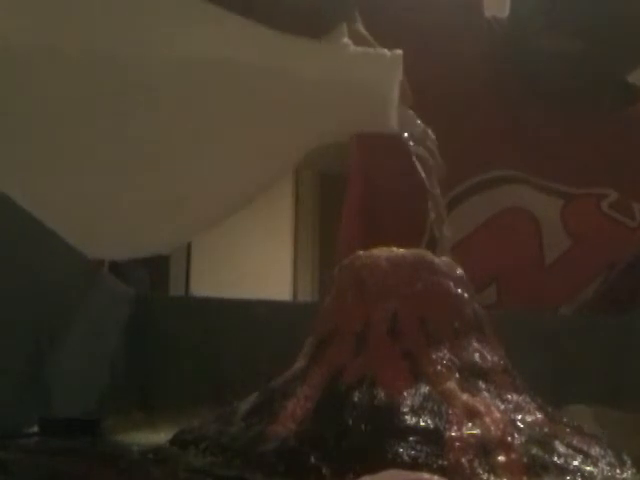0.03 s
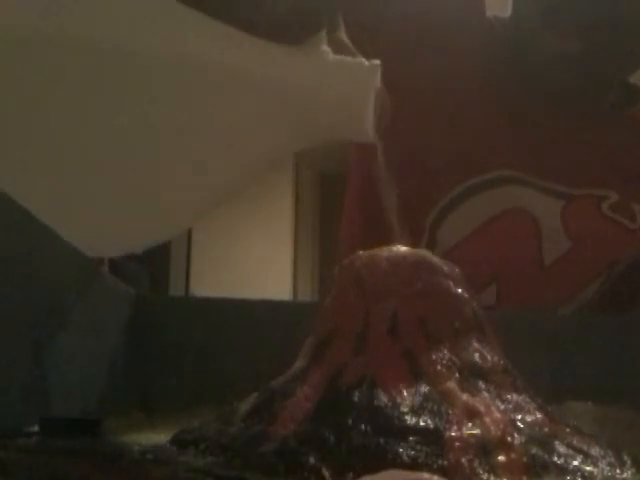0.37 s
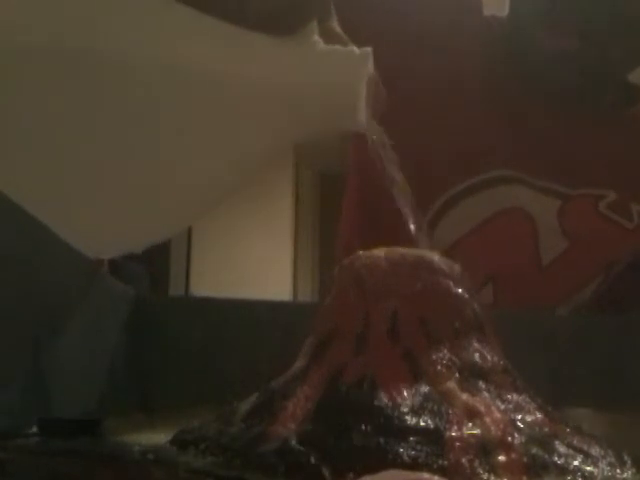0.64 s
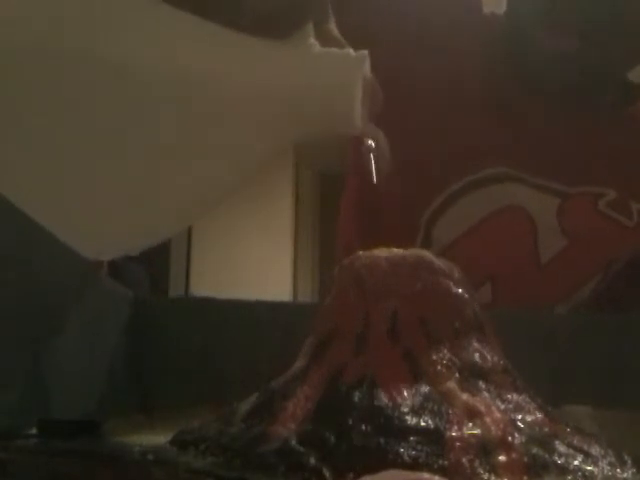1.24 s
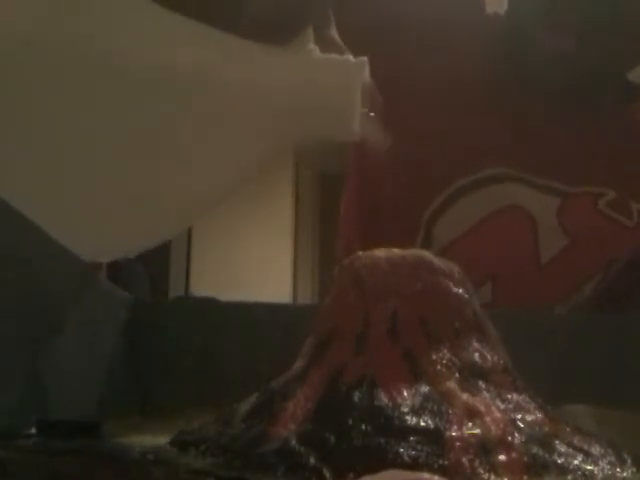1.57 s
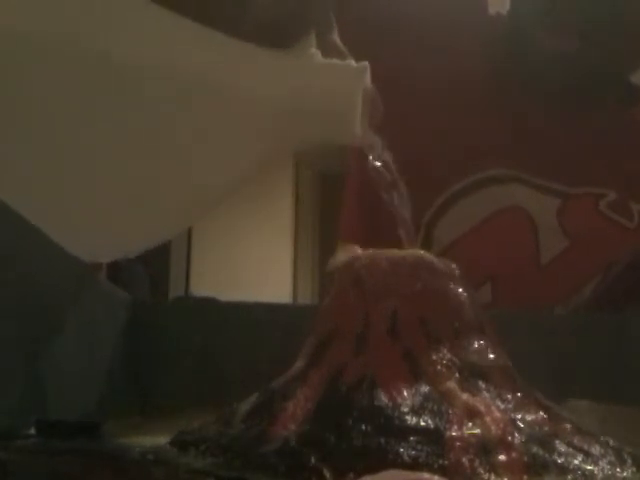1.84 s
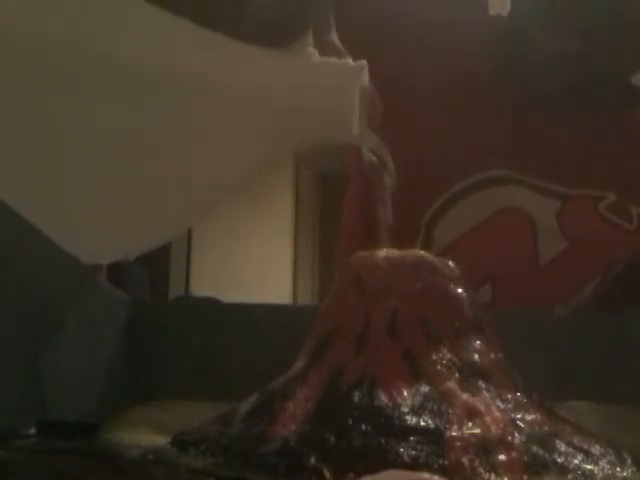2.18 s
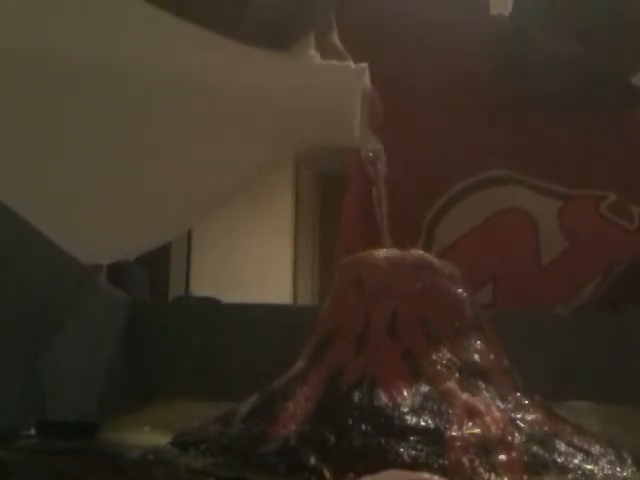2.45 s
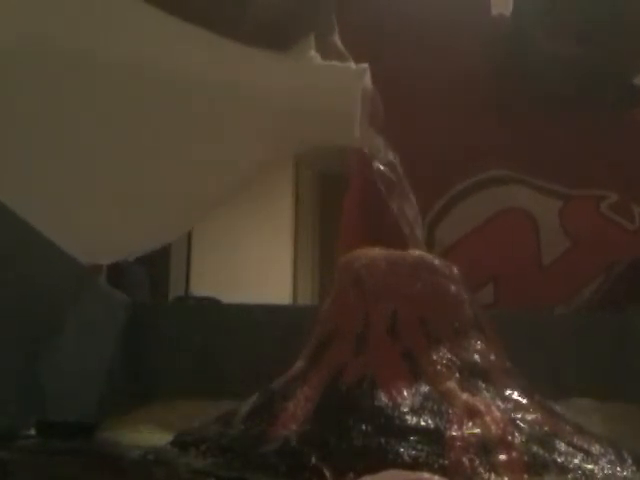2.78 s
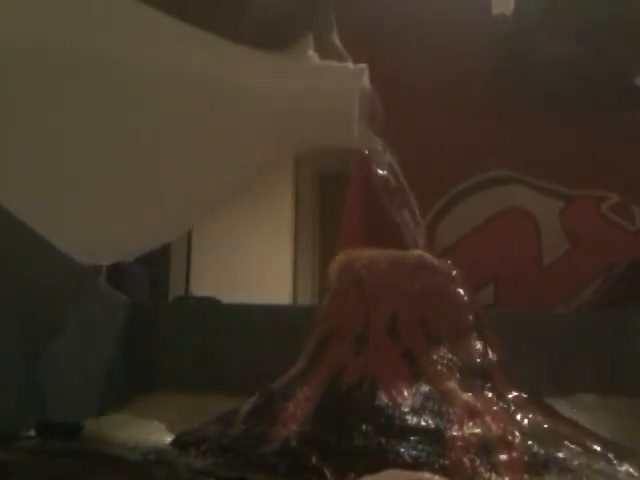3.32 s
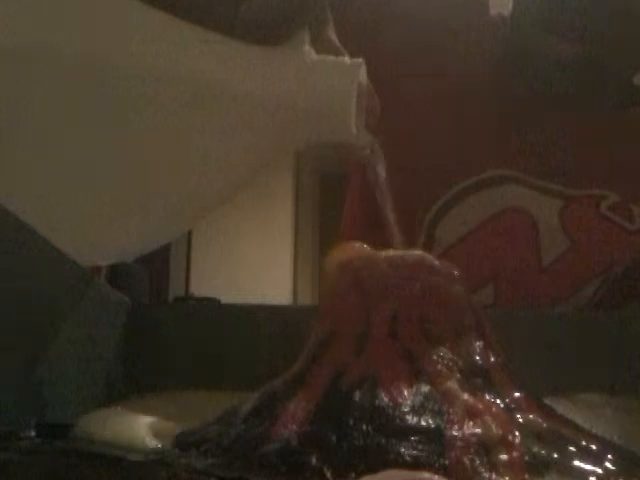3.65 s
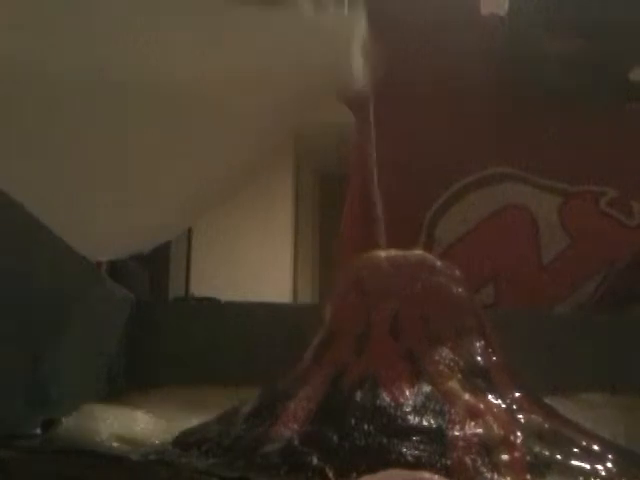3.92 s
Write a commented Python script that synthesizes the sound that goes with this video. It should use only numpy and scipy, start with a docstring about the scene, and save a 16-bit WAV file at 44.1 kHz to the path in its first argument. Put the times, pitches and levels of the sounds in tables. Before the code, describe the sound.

Foam fizzes faintly as liquid pours into a model volcano in a quiet room. Something brushes the microphone around 0.4 seconds, and soft hollow bumps come between 0.3 and 1.5 seconds. From 1.5 seconds the hiss swells, staying dense from about 2 seconds to the end at 4. Beneath it the stream softly patters, splashes and gurgles, while bubbles and drips snap here and there throughout.

```python
"""Foam hisses faintly, then swells, as liquid pours from a plastic jug into a model volcano.
Tiny bursts make the hiss: the finest bubbles first, coarser ones as the foam spreads.
The stream patters, gurgles and splashes softly on the cone; a few large bubbles and drips snap.
Early on something brushes the small camera, and soft bumps ring a hollow body.
The room is quiet; the sound is mono."""
import sys
import numpy as np
from scipy import signal
from scipy.fft import rfft, irfft
from scipy.io import wavfile

SR = 44100
rng = np.random.default_rng(int(sys.argv[2]) if len(sys.argv) > 2 else 0)


def put_to_file(sound):
    """Save the sound as 16-bit audio at rate SR, in the file named by the first command-line argument."""
    columns = np.atleast_2d(sound).T  # one column per channel
    safe = np.clip(columns, -1, 1)
    whole_steps = np.round(safe * 32767)
    wavfile.write(sys.argv[1], SR, whole_steps.astype(np.int16))


N = 176400
T = np.arange(N) / SR

# Foam level by bubble size. Each row: time in seconds, fine, medium and coarse level in dB.
FOAM_LEVELS = [(0.0, -55, -54.5, -60.5), (0.23, -51, -54.5, -61), (0.55, -50.5, -50.5, -63),
               (0.68, -54.5, -57, -67), (0.82, -53, -52, -58.5), (1.15, -54.5, -53.5, -60.5),
               (1.36, -52.5, -51, -64), (1.5, -48.5, -47.5, -55.5), (1.7, -43.5, -44.5, -66),
               (2.08, -39.5, -39.5, -58), (2.3, -39.5, -37, -56), (2.55, -41, -36, -50),
               (2.74, -42, -36, -46.5), (2.88, -41.5, -37.5, -49), (3.3, -41, -36.5, -46.5),
               (3.55, -42, -36, -45.5), (3.82, -40, -36.5, -45), (4.0, -39.5, -35.5, -44)]


def amp(db):
    """Decibels to gain."""
    return 10 ** (np.asarray(db) / 20)


def unit_rms(x):
    """Scales to an rms of 1."""
    return x / np.sqrt(np.mean(x ** 2) + 1e-20)


def envelope(levels):
    """Gain curve through rows of time in seconds, level in dB."""
    return amp(np.interp(T, *np.transpose(levels)))


def add(mix, start_s, sound):
    """Mixes a sound in at start_s."""
    part = mix[max(round(start_s * SR), 0):][:len(sound)]
    part += sound[:len(part)]


def convolve(x, taps):
    """Applies taps scaled to unit energy; keeps the length of x."""
    return signal.fftconvolve(x, taps / np.linalg.norm(taps))[:len(x)]


def colour(x, spectrum, size=4096):
    """Minimum-phase filter through rows of frequency in Hz, relative level in dB."""
    hz, db = np.transpose(spectrum)
    bins_hz = abs(np.fft.fftfreq(size, 1 / SR))
    log_gain = np.log(amp(np.interp(np.log(bins_hz + 1), np.log(hz), db)))
    response = np.exp(np.conj(signal.hilbert(log_gain)))
    return convolve(x, np.fft.ifft(response).real)


def wander(corner_hz):
    """Random drift from 2 Hz up, rolling off above corner_hz; rms 1."""
    hz = np.fft.rfftfreq(N, 1 / SR)
    spectrum = rfft(rng.standard_normal(N)) * (hz > 2) / (1 + (hz / corner_hz) ** 2)
    return unit_rms(irfft(spectrum, N))


def clicks(per_s, spread_db):
    """Random clicks of uneven size and sign; rms 1."""
    size = amp(spread_db * np.minimum(rng.exponential(1, N), 5))
    sign = rng.choice([-1., 1.], N)
    return unit_rms(size * sign * (rng.random(N) < per_s / SR))


def ring(modes, t):
    """Free decay of an object's modes, at random phases."""
    return sum(amp(db - 60 * t / t60_s) * np.sin(2 * np.pi * (hz * t + rng.random()))
               for hz, db, t60_s in modes)


def foam(flutter_db=0.5):
    """Thousands of tiny bursts a second, in three sizes that swell one after another."""
    # Burst spectra by bubble size. Each row: frequency in Hz, relative level in dB.
    fine = [(3000, -70), (6000, -18), (7900, -7.5), (9300, -10), (10200, -5.5), (11200, -1), (12700, 0.5),
            (13600, 0), (15200, -14.5)]
    medium = [(1500, -44), (2600, -18), (3300, -14.5), (4000, -9.5), (4650, -4.5), (4900, -4), (5330, -1),
              (5850, -6.5), (6350, -11), (6800, -10), (7500, -14), (9500, -19.5), (14000, -47.5)]
    coarse = [(250, -5), (500, -16.5), (950, -24.5), (1150, -9.5), (1500, 2), (1750, -6), (2080, 4),
              (2450, -8.5), (3000, -1), (4200, -6), (7000, -8), (11000, -8.5)]
    times_s, *levels_db = np.transpose(FOAM_LEVELS)
    out = np.zeros(N)
    for db, spectrum in zip(levels_db, (fine, medium, coarse)):
        bursts = colour(clicks(per_s=16000, spread_db=1.86), spectrum)
        out += bursts * amp(np.interp(T, times_s, db) + flutter_db * wander(corner_hz=25))
    return out


def crackle(surge_db=4.5, relative_db=-14):
    """Clumps of foam collapse in small surges, following the level of the medium bubbles."""
    # Collapse spectrum. Each row: frequency in Hz, relative level in dB.
    spectrum = [(2000, -35.5), (3800, -16.5), (4650, -9), (4900, -12), (5330, 0), (5800, -12), (7000, -17),
                (9500, -25), (13000, -24)]
    times_s, _, medium_db, _ = np.transpose(FOAM_LEVELS)
    surges = unit_rms(clicks(per_s=500, spread_db=2) * amp(surge_db * wander(corner_hz=8.4)))
    return colour(surges, spectrum) * amp(np.interp(T, times_s, medium_db) + relative_db)


def stream():
    """The stream patters softly on the cone."""
    # Patter strength. Each row: time in seconds, level in dB.
    levels = [(0.0, -65), (1.3, -73), (1.8, -59), (2.35, -69), (2.6, -58), (2.9, -75), (3.18, -55.5),
              (3.52, -75), (3.75, -57), (4.0, -55.5)]
    # Patter spectrum. Each row: frequency in Hz, relative level in dB.
    spectrum = [(45, -28), (80, -6), (140, 3.5), (190, -6), (300, 5), (480, 0), (720, -4.5), (930, -13),
                (1150, -17), (2500, -45)]
    return colour(clicks(per_s=180, spread_db=0.5) * envelope(levels), spectrum)


def gurgle(low_hz=600.5, high_hz=2760, sizes=40, per_s=600, decay_cycles=6, spread_db=2.5):
    """Air bubbles trapped by the stream ring for a few cycles, damped by the foam."""
    # Gurgle strength. Each row: time in seconds, level in dB.
    levels = [(0.0, -68), (1.6, -66), (2.0, -60), (2.35, -61), (2.6, -55.5), (2.9, -56.5), (3.5, -55.5),
              (4.0, -49.5)]
    # Gurgle spectrum. Each row: frequency in Hz, relative level in dB.
    spectrum = [(500, -1), (950, -4), (1200, -2.5), (1500, 1.5), (1750, -2), (2080, 1.5), (2700, -0.5)]
    out, t = np.zeros(N), T[:4096]
    for hz in np.linspace(low_hz, high_hz, sizes):
        age = t * hz / decay_cycles
        blip = (1 - np.exp(-6 * age)) * np.exp(-age) * np.sin(2 * np.pi * hz * t)
        births = rng.random(N) < per_s / sizes / SR
        strength = amp(spread_db * rng.uniform(-2.2, 2, N))
        out += convolve(births * strength, blip)
    return unit_rms(colour(out, spectrum)) * envelope(levels)


def room(drift_hz=1.3):
    """Low rumble of the room's air, slowly rising, with a faint hum."""
    # Air spectrum. Each row: frequency in Hz, relative level in dB.
    spectrum = [(20, -2), (45, -2), (88, 2), (140, 1), (185, -6.5), (240, -5.5), (330, -2.5), (430, -11.5),
                (478, -1.5), (525, -21.5), (620, -7.5), (1000, -17), (2000, -31), (5000, -19.5)]
    # Air noise strength. Each row: time in seconds, level in dB.
    levels = [(0.0, -59.5), (0.65, -56), (1.0, -54.5), (1.7, -54), (3.0, -53.5), (4.0, -50)]
    # Hum tones. Each row: frequency in Hz, rms level in dB.
    tones = [(89, -68), (480, -73)]
    out = unit_rms(colour(rng.standard_normal(N), spectrum)) * envelope(levels)
    for hz, db in tones:
        cycles = np.cumsum(hz + drift_hz * wander(corner_hz=14)) / SR
        out += amp(db) * unit_rms(np.sin(2 * np.pi * cycles))
    return out


def pops(crack_decay_s=0.00051):
    """Large bubbles and drips snap: a sharp crack, then a few cycles of ringing."""
    # Snaps. Each row: start in seconds, level in dB, pitch in Hz, decay in ms, relative crack gain.
    snaps = [(0.0150, -34.5, 4800, 0.48, 0.15), (0.0325, -37, 4900, 0.21, .13),
             (0.0745, -34, 5400, .3, .13), (0.0795, -27.5, 5460, 0.32, 0.16), (0.3647, -29, 5800, 0.2, .4),
             (0.582, -33, 5760, 0.14, 0.49), (0.7066, -31, 4690, 0.32, .05),
             (0.7172, -26, 5150, 0.24, 0.06), (0.7276, -32, 4180, 0.27, 0.33),
             (0.7815, -33, 5700, 0.17, .2), (0.884, -34, 5220, 0.16, .2), (0.9036, -35, 5170, 0.25, .25),
             (0.9435, -33, 5230, .2, .2), (0.9687, -33.5, 5180, 0.18, .25), (1.4640, -29, 4530, 0.16, .13),
             (1.5115, -23.5, 5450, 0.33, 1.6), (1.8855, -31, 5330, 0.63, .06),
             (1.8924, -17, 5500, 0.18, .1), (2.1980, -26, 5170, 0.4, 0.2), (2.4914, -24, 5150, 0.46, 0.06),
             (2.7765, -23.5, 3840, 0.57, 0.04), (2.9756, -19.5, 5100, 0.12, 0.27),
             (3.2917, -28, 5300, 0.22, .25)]
    # Crack spectrum. Each row: frequency in Hz, relative level in dB.
    spectrum = [(200, -9), (750, -3.5), (2200, -24), (4500, -9), (6800, -5), (9500, -11), (11500, -14),
                (13400, 4.5), (14500, -13)]
    out, t = np.zeros(N), T[:1024]
    for start_s, db, hz, decay_ms, crack_gain in snaps:
        age = t * 1000 / decay_ms
        ping = age * np.exp(1 - age) * np.sin(2 * np.pi * hz * t)
        crack = colour(rng.choice([-1., 1.], len(t)) * np.exp(-t / crack_decay_s), spectrum)
        add(out, start_s, amp(db) * (ping + crack_gain * crack))
    return out


def echo(x, level_db=-4.5, delay_s=0.002, t60_s=0.075):
    """Short scatter from the tray and nearby walls."""
    t = T[:SR // 4]
    reflections = rng.standard_normal(len(t)) * (rng.random(len(t)) < 0.3)
    decay = (t > delay_s) * amp(-60 * t / t60_s)
    return amp(level_db) * convolve(x, reflections * decay)


def brush(grips_per_s=2500, flutter_db=2.4, case_db=-3):
    """Many small grips and slips make a low rumble and a dry scratch, and ring the camera's case."""
    # Brush stroke. Each row: time in seconds, rumble level in dB, scratch level in dB.
    stroke = [(0.25, -68, -59), (0.272, -53, -50.5), (0.30, -46, -69), (0.325, -44.5, -44),
              (0.365, -34, -41), (0.41, -38, -43), (0.45, -41, -42.5), (0.49, -55, -48), (0.55, -66, -68)]
    # Friction spectra. Each row: frequency in Hz, relative level in dB.
    rumble_spectrum = [(20, -8), (70, 2), (150, 0.5), (230, -5.5), (330, -8), (460, -16.5), (590, -4),
                       (750, -17), (900, -15), (1300, -18.5), (2500, -25)]
    scratch_spectrum = [(400, 3.5), (1000, -36), (1600, -5), (2100, -7), (2700, -6), (3900, -4), (4800, 4),
                        (5500, 5.5), (6400, -5), (8000, 2.5), (9500, -12), (13000, -12), (15000, -22)]
    # Case modes. Each row: frequency in Hz, relative level in dB, T60 in seconds.
    case_modes = [(139, -4.5, 0.12), (210, 0.5, 0.15), (533, -6, 0.16), (592, 1, 0.08), (675, -3, 0.14),
                  (780, -5, 0.088), (890, -7.5, 0.16), (1006, -8, 0.13), (1140, -13, 0.14),
                  (1510, -5, 0.052), (2080, -4.5, 0.03)]
    times_s, rumble_db, scratch_db = np.transpose(stroke)
    grips = clicks(grips_per_s, spread_db=1) * amp(np.interp(T, times_s, rumble_db))
    slips = clicks(grips_per_s, spread_db=2.6)
    slips *= amp(np.interp(T, times_s, scratch_db) + flutter_db * wander(corner_hz=90))
    hollow = amp(case_db) * convolve(slips, ring(case_modes, T[:SR // 4]))
    touching = (T > times_s[0]) * (T < times_s[-1])
    return (colour(grips, rumble_spectrum) + colour(slips, scratch_spectrum) + hollow) * touching


def bumps():
    """Soft, scuffing contacts set a hollow body ringing."""
    # Contacts. Each row: start in seconds, ring gain in dB, contact time in seconds, scuff level in dB.
    contacts = [(0.263, -33, 0.017, -49), (0.497, -31, 0.036, -59), (0.776, -34.5, 0.019, -50),
                (0.883, -62, .005, -52), (0.901, -56, 0.0058, -51), (0.986, -34.5, 0.019, -48),
                (1.046, -64, 0.015, -53.5), (1.516, -41, 0.012, -68)]
    # Body modes. Each row: frequency in Hz, relative level in dB, T60 in seconds.
    body_modes = [(112, 1, 0.047), (232, -1, .11), (409, -8.5, 0.051), (605, -14, 0.067), (774, -13, 0.15),
                  (1040, -10, 0.049), (1486, -2, 0.02), (1720, -19.5, 0.1)]
    # Scuff spectrum. Each row: frequency in Hz, relative level in dB.
    spectrum = [(100, -52), (400, 4), (900, 0), (1700, -2.5), (2600, -4.5), (4000, -20), (8000, -3),
                (14000, -35)]
    out, t = np.zeros(N), T[:SR // 4]
    for start_s, ring_db, contact_s, scuff_db in contacts:
        age = 2 * t / contact_s
        scuff = colour(rng.standard_normal(len(t)) * age * np.exp(1 - age), spectrum)
        thud = ring(body_modes, t) * (1 - np.exp(-age))
        add(out, start_s, amp(ring_db) * thud + amp(scuff_db) * scuff)
    return out


def splashes():
    """Each gush breaks on the cone into a soft spray of droplets that swells and dies away."""
    # Gushes. Each row: start in seconds, level at the crest in dB, rise time in seconds.
    gushes = [(1.8, -55, 0.016), (2.172, -47.5, 0.026), (2.685, -65, 0.0097), (3.145, -55, 0.027)]
    # Spray spectrum. Each row: frequency in Hz, relative level in dB.
    spectrum = [(100, -8), (220, 5), (400, 2), (800, 4), (1150, -8), (1500, -1), (2200, -3), (4000, -19),
                (9000, -18)]
    swell = np.zeros(N)
    for start_s, db, rise_s in gushes:
        age = np.maximum(T - start_s, 0) / rise_s
        swell += amp(db) * (age * np.exp(1 - age)) ** 2
    return colour(clicks(per_s=1500, spread_db=1) * swell, spectrum)


def scene():
    """All sources at one microphone, the same in both channels; only the snaps echo."""
    snaps = pops()
    liquid = foam() + crackle() + stream() + gurgle() + splashes()
    mono = liquid + snaps + echo(snaps) + brush() + bumps() + room()
    return np.array([mono, mono])


def record(dry):
    """Steep low-pass: the camera's band limit."""
    cutoff_hz = 14660
    taps = signal.firwin(1023, cutoff_hz, window=("kaiser", 9), fs=SR)
    return signal.oaconvolve(dry, taps[None], "same")


dry = scene()
out = record(dry)
put_to_file(out)
```